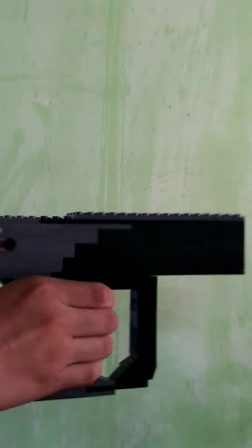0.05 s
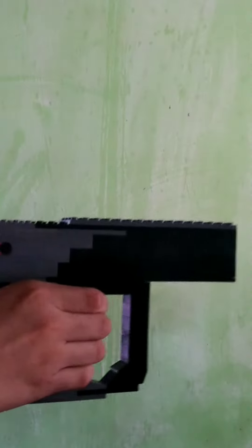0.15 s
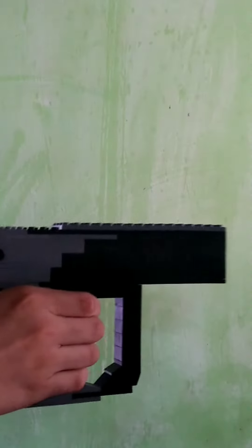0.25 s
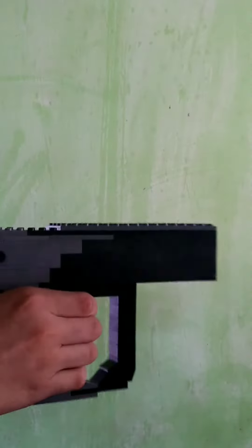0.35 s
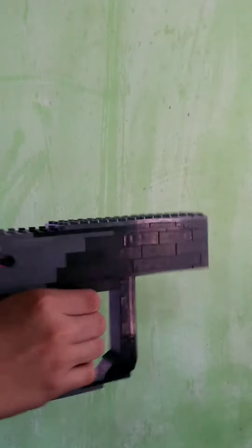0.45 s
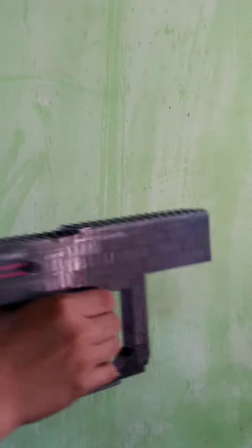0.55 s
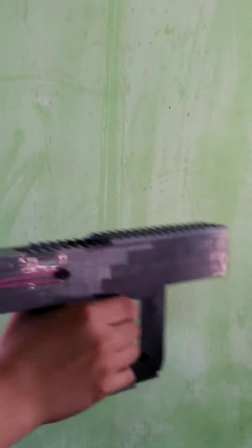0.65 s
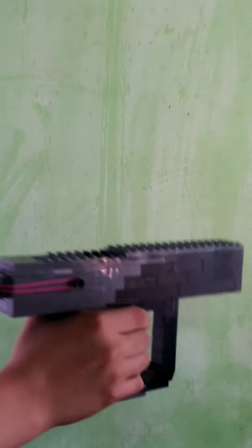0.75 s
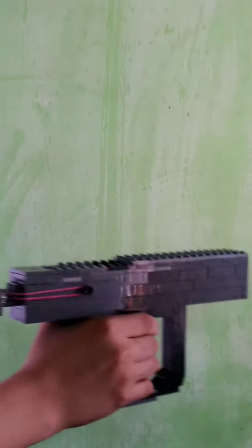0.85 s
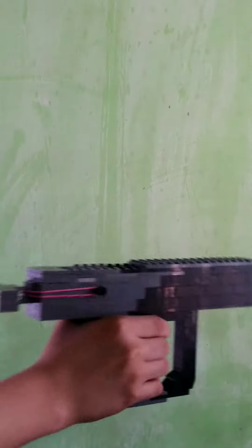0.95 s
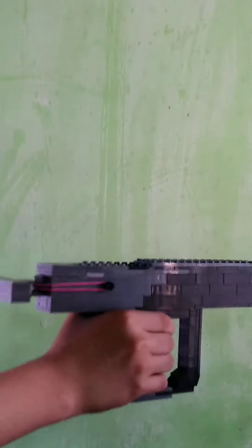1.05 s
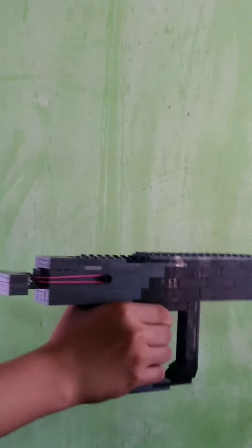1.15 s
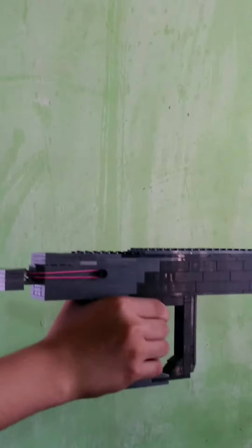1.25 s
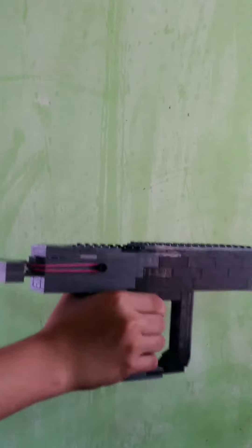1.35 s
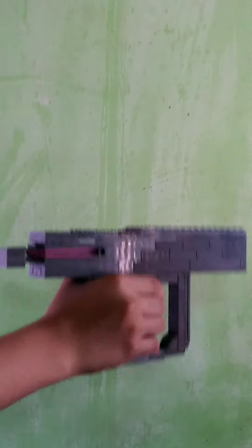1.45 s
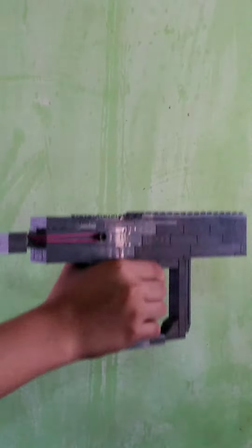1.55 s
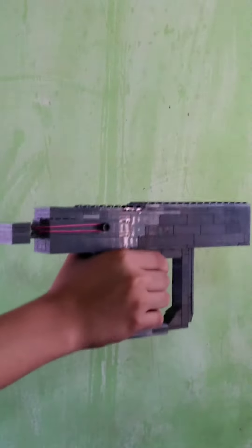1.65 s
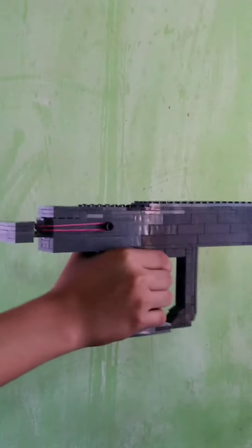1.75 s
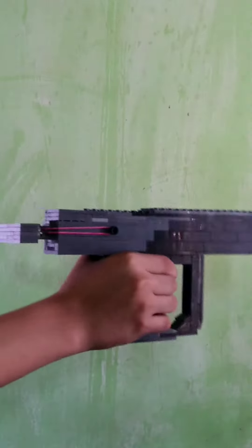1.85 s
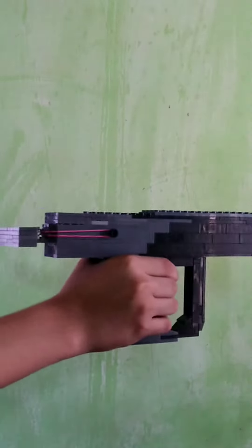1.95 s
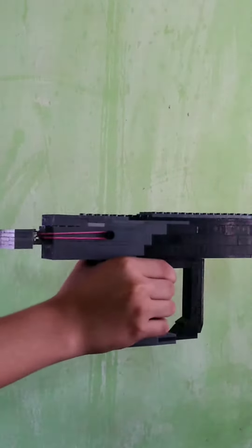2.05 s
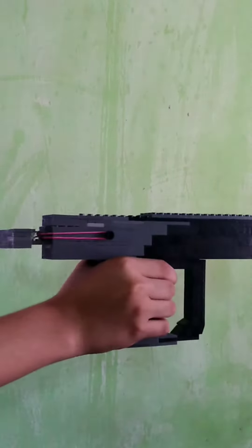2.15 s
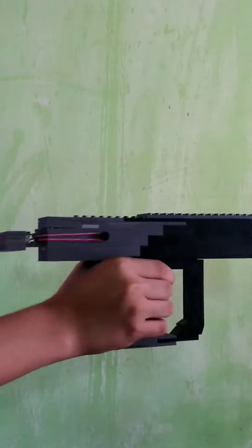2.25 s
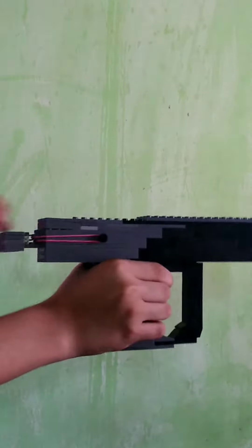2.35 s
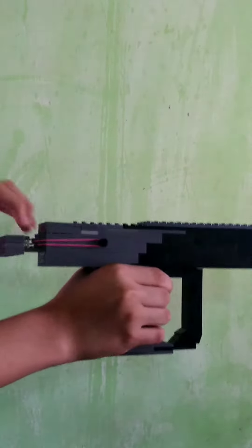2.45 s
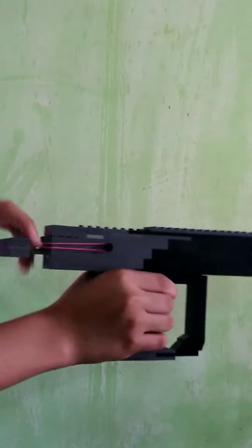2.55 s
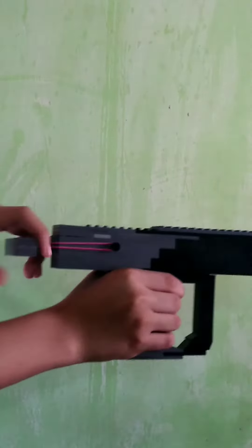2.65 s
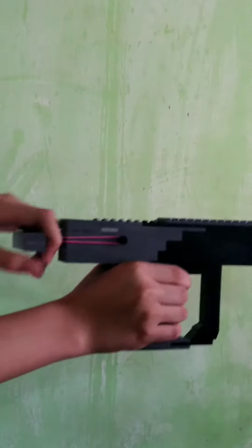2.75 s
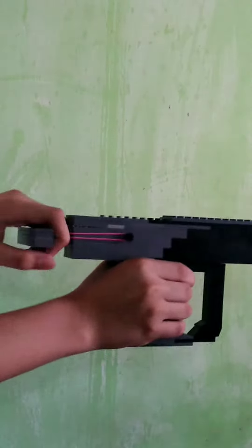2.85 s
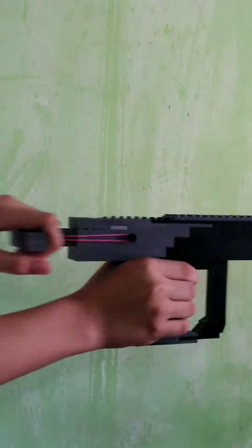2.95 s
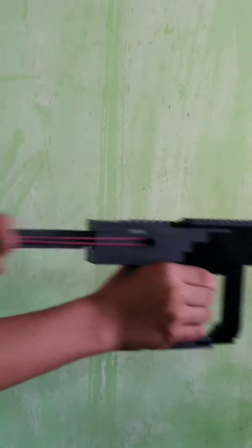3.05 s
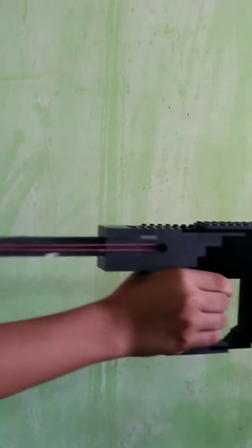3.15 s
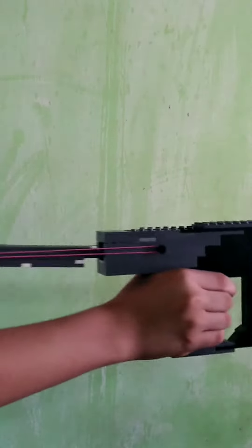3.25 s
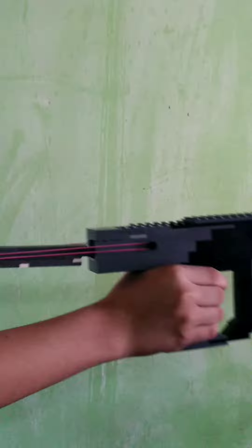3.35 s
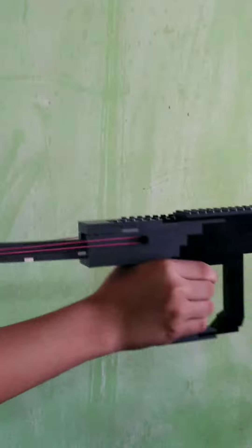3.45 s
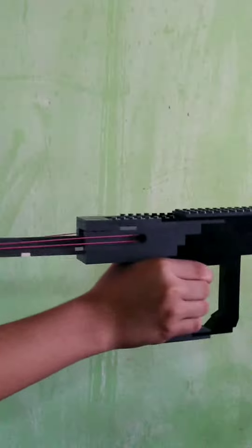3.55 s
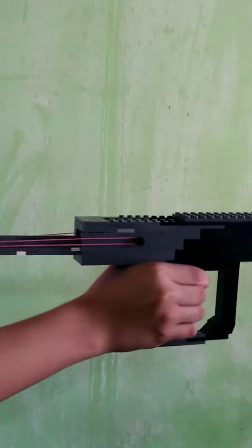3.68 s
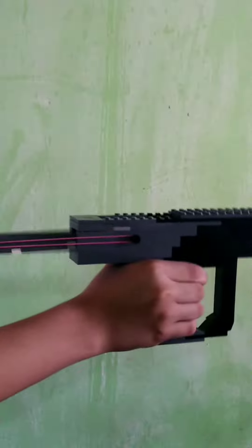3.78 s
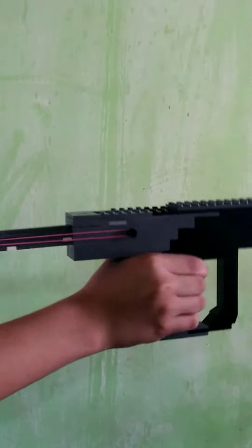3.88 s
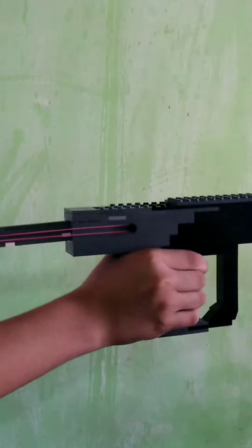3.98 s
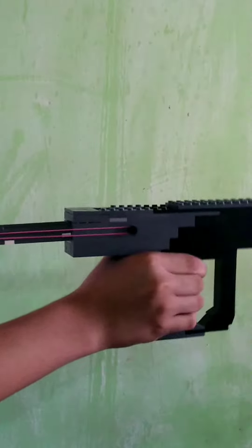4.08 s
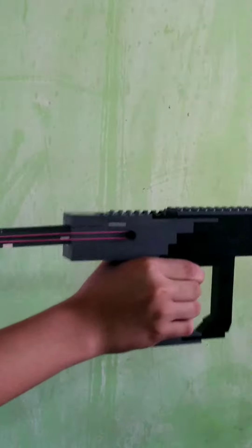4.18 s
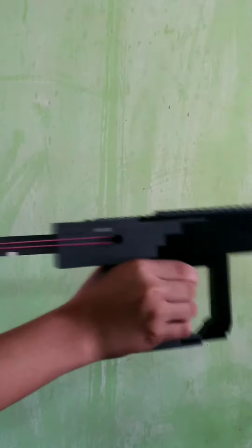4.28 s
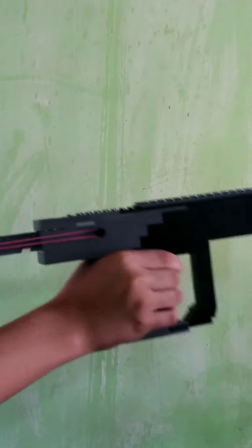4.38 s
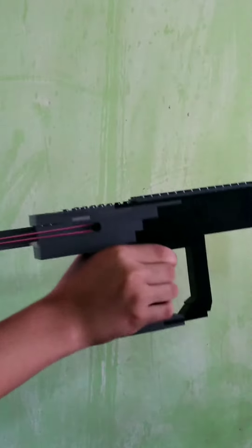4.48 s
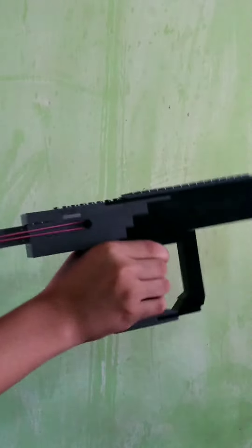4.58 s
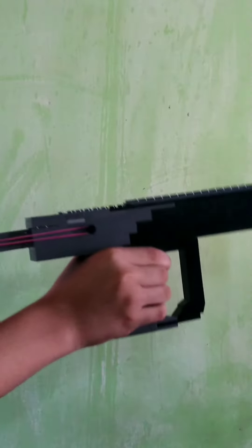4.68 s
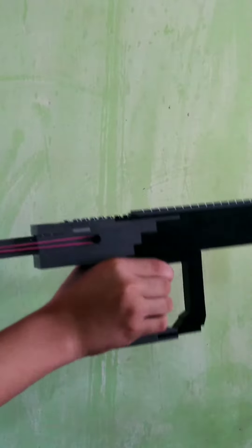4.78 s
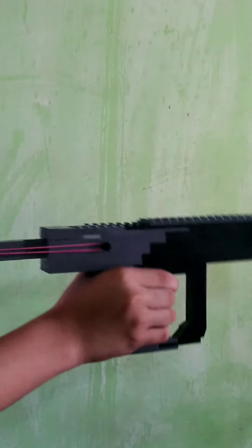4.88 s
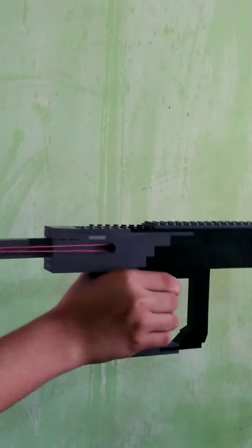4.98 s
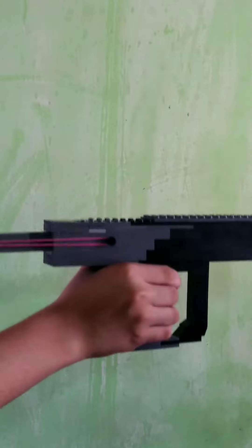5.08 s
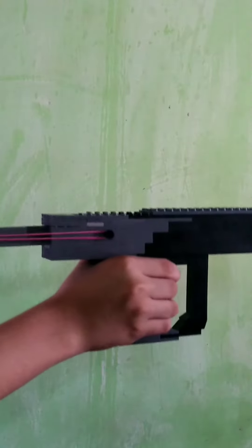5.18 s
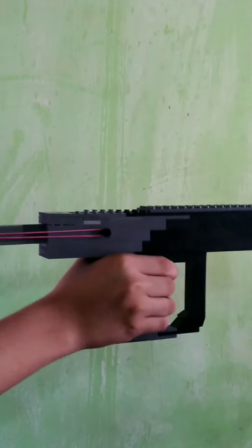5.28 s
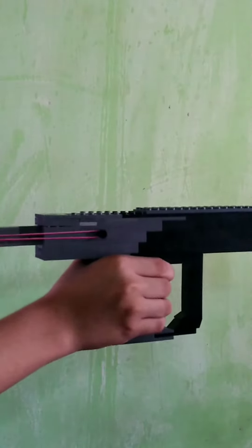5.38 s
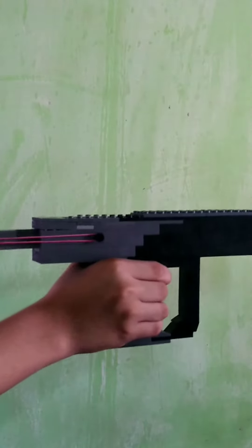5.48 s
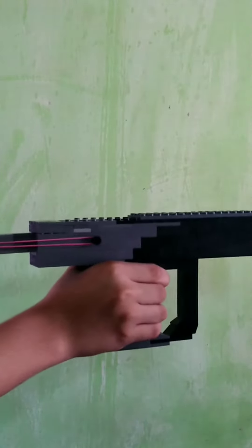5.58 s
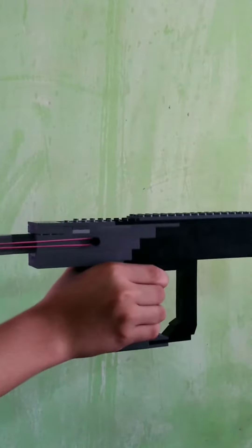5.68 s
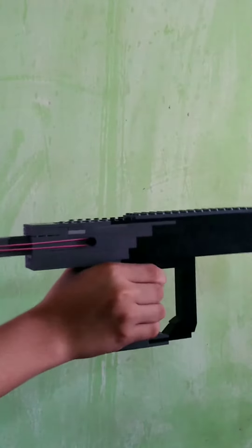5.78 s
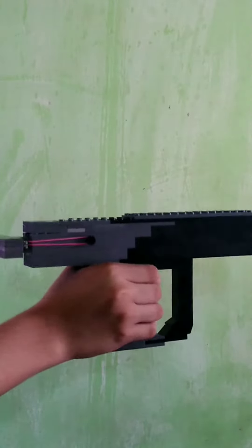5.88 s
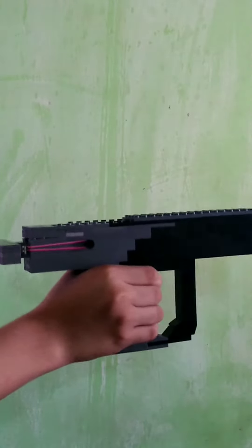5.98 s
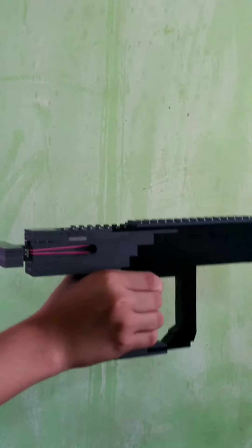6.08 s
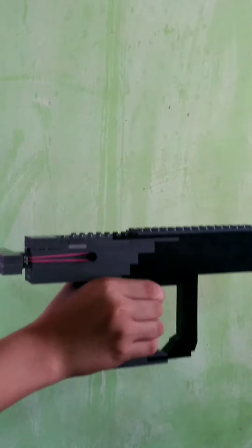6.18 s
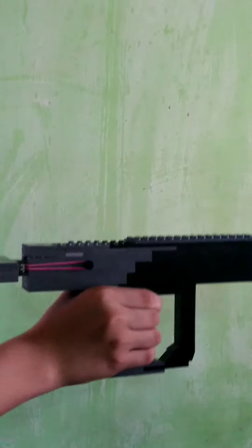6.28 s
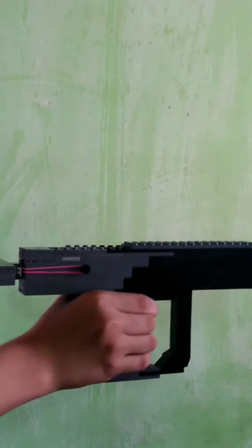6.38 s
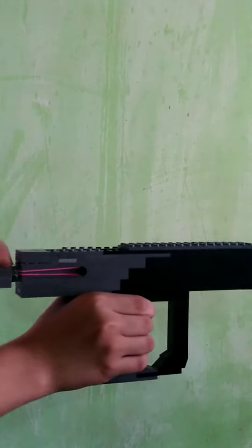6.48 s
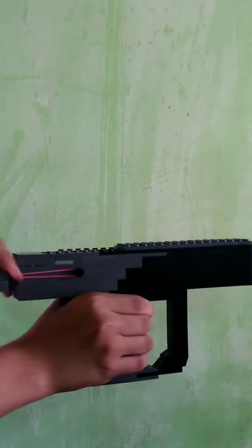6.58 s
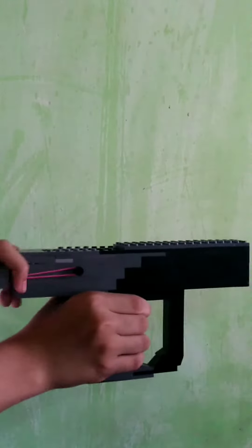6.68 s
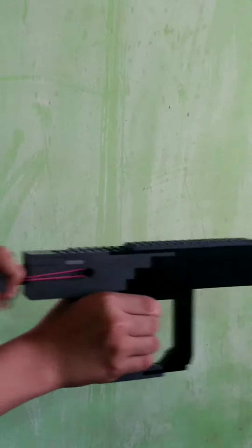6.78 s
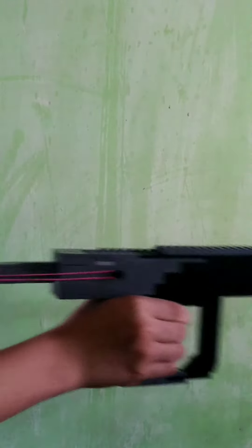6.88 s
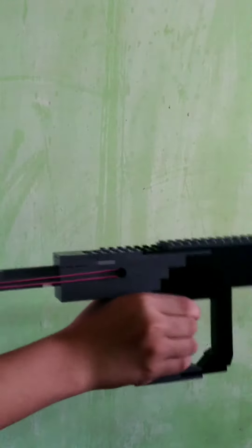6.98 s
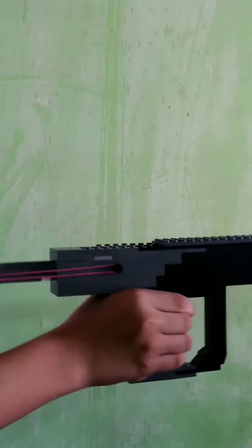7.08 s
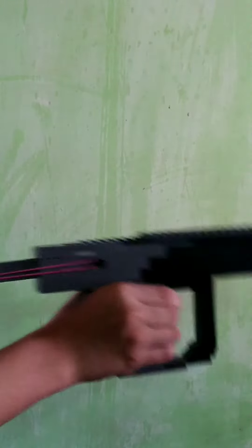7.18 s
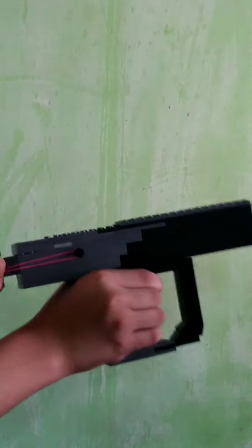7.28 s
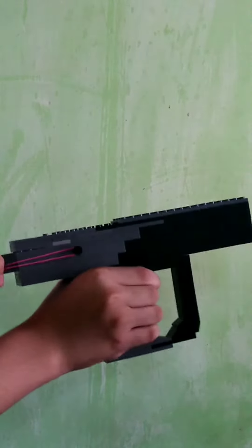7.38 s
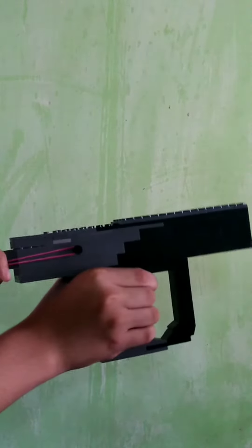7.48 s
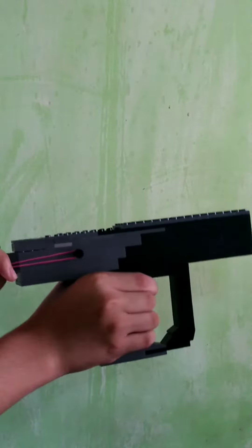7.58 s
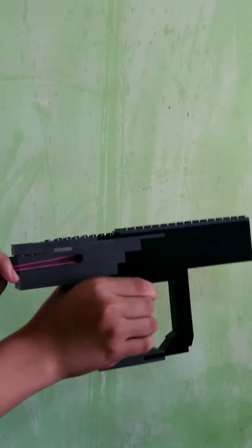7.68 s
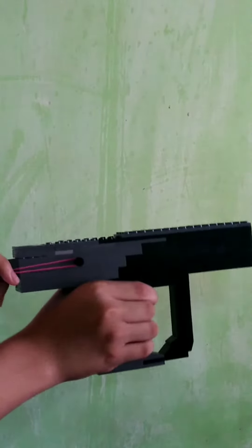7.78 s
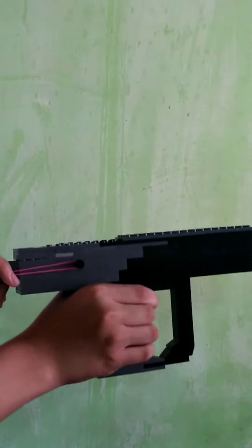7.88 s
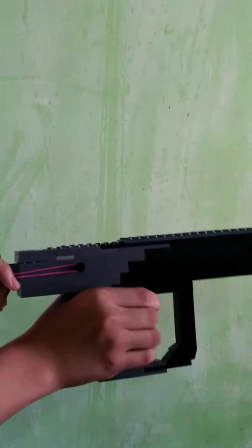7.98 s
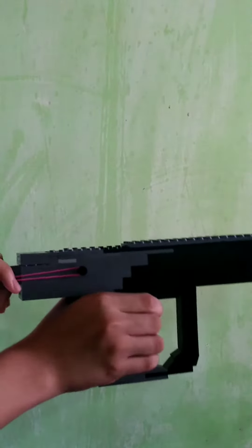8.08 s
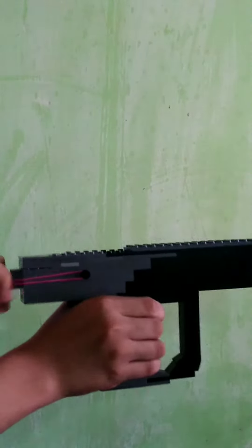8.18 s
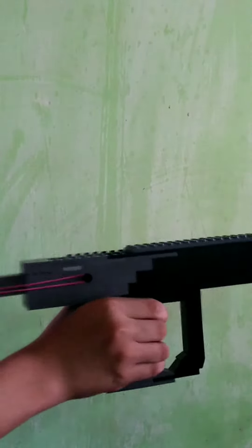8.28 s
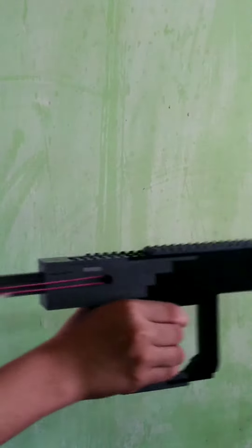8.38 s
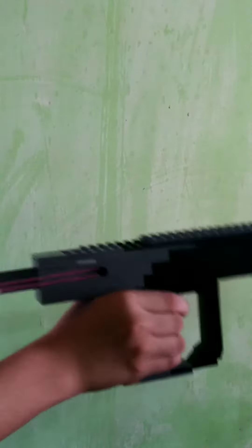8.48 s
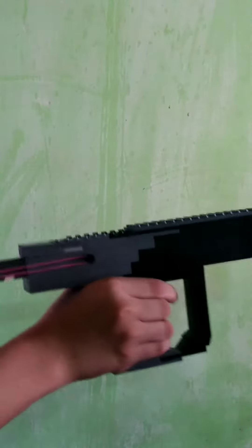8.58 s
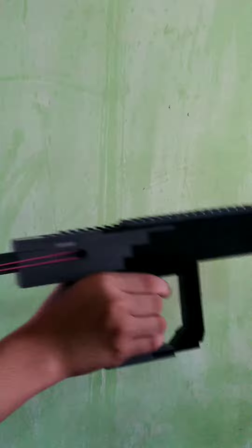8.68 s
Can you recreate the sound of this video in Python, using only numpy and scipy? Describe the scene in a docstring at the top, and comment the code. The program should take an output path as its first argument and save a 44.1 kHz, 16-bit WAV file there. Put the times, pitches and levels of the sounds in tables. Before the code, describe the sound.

A plastic brick toy gun is handled, cocked and fired in a small hard room, with sharp clacks, scrapes and low handling rumble.

```python
"""A toy gun of plastic bricks is cocked and fired in a small, hard-walled room: its slide catches, snaps and chatters.
Each contact is a noise burst with a rebound, coloured by the modes of the hollow shell and answered by the walls.
Small parts tick with modes of their own, the slide scrapes in grains, and tight bricks squeak as thin wavering tones.
Before the action, shaped noise rubs softly to one side and a padded bump is heard.
Under it all lie a dull room rumble and low handling noise, which buffets mostly the left port of the microphone."""
import sys
import numpy as np
from scipy import signal
from scipy.fft import rfft, irfft, next_fast_len
from scipy.io import wavfile
from scipy.ndimage import uniform_filter1d, map_coordinates

SR = 44100
rng = np.random.default_rng(int(sys.argv[2]) if len(sys.argv) > 2 else 0)


def transcribe(u):
    """Save the signal u as a 16-bit wav file named by the first command-line argument.

    u: samples, shape (n,) or (channels, n), limited to [-1, 1]; the rate is SR.
    q: integer samples, one column per channel.
    """
    v = np.clip(np.atleast_2d(u).T, -1, 1)
    q = np.round(v * 32767).astype(np.int16)
    wavfile.write(sys.argv[1], SR, q)


N = 385434  # length in samples

# All levels are relative: each layer sets its own gain on top.
# room rumble colour: f/Hz, density level/dB
AIR_COLOUR = [(15, -76.5), (25, -40.5), (50, -14), (122, 0), (208, -5.5), (278, -3.5), (309, -10),
              (392, -6.5), (554, -13), (599, -12), (761, -11.5), (916, -11.5), (1600, -31), (1950, -43),
              (2600, -44.5), (14000, -56.5)]
# left-right likeness of diffuse noise: f/Hz, correlation
PORT_LIKENESS = [(50, 1), (130, 0.82), (280, 0.93), (550, 0.67), (1000, 0), (3000, 0.16)]
# decay of the walls' answer: f/Hz, t60/s
ROOM_DECAY = [(300, 0.17), (1500, 0.3), (5000, 0.28), (9000, 0.27), (14000, 0.25)]
# handling noise colour: f/Hz, density level/dB
BUFFET_COLOUR = [(20, -47), (36, -26), (50, -14), (70, 0.5), (110, -4.5), (160, -10), (250, -21.5),
                 (500, -44.5), (1200, -80.5)]
# handling jolts at the left port: t/s, level/dB
JOLTS = [(5.445, -43), (5.52, -39.5), (6.26, -40.5), (6.38, -40.5), (6.435, -41), (7.878, -37.5),
         (8.056, -33.5), (8.181, -26.5), (8.36, -27.5)]
# longer shifts of the grip: start t/s, length/s, left level/dB, right level/dB
GRIP_SHIFTS = [(6.09, 0.41, -51.5, -69.5), (8.001, .22, -35.5, -58.5), (8.232, 0.24, -33, -49),
               (8.478, .1, -39.5, -42), (8.595, 0.134, -42, -49)]
# padded bump colour: f/Hz, density level/dB
BUMP_COLOUR = [(30, -38), (60, -18), (95, 5), (150, -3), (280, -9.5), (400, -17), (800, -15), (1200, -39),
               (2200, -42.5), (3000, -65)]
# faint squeaks of tight bricks: start t/s, length/s, mean pitch f/Hz, level/dB
SQUEAKS = [(2.585, 0.019, 6300, -69), (2.62, 0.076, 6400, -83), (7.97, 0.16, 6490, -80)]
# soft rubbing strokes: start t/s, length/s, level/dB, low rasp level/dB
RUB_STROKES = [(.185, .045, -77, -2), (.61, .03, -76, -4), (0.824, 0.036, -70, -2), (.918, .1, -60, 7.5),
               (1.039, .23, -62, -4.5), (1.268, 0.046, -54.5, -4), (1.506, 0.049, -53.5, -2),
               (1.598, 0.035, -64, -8), (2.021, 0.052, -59, 12.5)]
# rubbing colour: f/Hz, density level/dB
RUB_COLOUR = [(1000, -4.5), (1900, -8), (2600, -10), (3400, -12.5), (4400, -1.5), (6000, 7.5), (8000, -1),
              (11000, -9), (14000, -27)]
# rubbing balance: f/Hz, left over right level/dB
RUB_PAN = [(1200, -10), (2300, -7), (4300, -9.5), (7800, 7.5), (14000, 17)]
# the slide dragging over brick seams: start t/s, length/s, level/dB
DRAGS = [(3.08, .09, -41.5), (3.2, 0.12, -51.5), (4.308, .11, -55), (7.201, 0.1, -48.5),
         (8.305, 0.15, -42.5)]
# modes of four small parts: f/Hz, width/Hz, level/dB
GRIP = [(1600, 85, 5), (1860, 89, 0), (2070, 77, 3), (3000, 150, -20)]
LATCH = [(2900, 150, 6), (3430, 150, -10), (3830, 150, 3), (4900, 220, 1.5), (6140, 300, -10),
         (9550, 200, -8), (10480, 250, -12), (11130, 200, -11), (12630, 200, -10)]
SLIDE_STOP = [(1570, 130, 5), (2950, 130, 3.5), (3270, 140, -11), (4270, 170, -4.5), (4670, 150, -4),
              (5480, 290, -7), (6000, 250, -2.5), (8440, 280, -9.5), (9300, 200, -24), (10500, 300, -13),
              (11100, 200, -20)]
TRIGGER = [(272, 22, 22), (900, 67, 8), (1320, 46, 5), (1680, 150, -1.5), (3050, 100, -3.5),
           (3800, 160, -13), (4830, 180, -7), (5480, 140, -2.5), (6900, 130, 0), (7450, 180, -4.5),
           (8700, 120, -14), (12950, 200, -24)]
# light ticks of single parts: t/s, level/dB, left over right level/dB, room level/dB, modes of the part
TICKS = [(1.964, -34.5, -2.5, 2, GRIP), (2.43, -39, -5.5, -7.5, LATCH),
         (3.513, -30.5, -3.5, 0.5, SLIDE_STOP), (5.296, -27, -2, 2.5, TRIGGER)]
# brick contacts: t/s, level/dB, then hollow knock, mid clack and bright edge level/dB
CONTACTS = [(3.0617, -29, 3, -0.5, -19), (3.111, -28.5, -9, -11, -25), (3.1853, -29.5, -7.5, -12, -12),
            (3.2882, -25, -18, -22, -13.5), (3.8649, -24.5, -4.5, -12, -24), (4.3189, -48, 16, 4, -33.5),
            (4.3386, -33, -6, -10, -27), (4.4155, -32, -5, -10, -28), (4.6046, -15.5, -14.5, -17, -18.5),
            (5.8478, -11.5, -11, -14, -18), (5.8627, -12.5, -17, -11, -15), (5.8691, -10.5, -16, -5.5, -16),
            (5.8843, -19.5, -16.5, -14, -16), (5.8958, -17.5, -14.5, -16, -17),
            (6.8599, -27, -3.5, -10, -20), (6.8918, -13.5, -13.5, -11.5, -21),
            (6.9177, -14, -18.5, -15.5, -16), (7.216, -28, -5, -8.5, -28), (7.276, -17.5, -11, -7, -21),
            (7.3145, -25, -23, -16, -25.5), (8.3175, -23, -2, -9.5, -23.5), (8.3553, -29, 0.5, -17, -11.5),
            (8.4264, -35, 3, -3, -28), (8.4434, -32.5, 1, -8, -29), (8.5446, -41.5, 8, -5, -45),
            (8.5731, -36.5, -3, -6, -52), (8.6016, -33.5, -8, 4.5, -59)]
# modes of the hollow brick body: f/Hz, width/Hz, level/dB
BODY_MODES = [(809.6, 43, -0.5), (1080, 18, -4), (1301, 26, 6), (1538, 20, 0), (1950, 110, -15.5),
              (2670, 90, -3), (2900, 94, 2), (3100, 25, -1), (3380, 63, 0.5), (3896, 41, -1.5),
              (4240, 17, -3.5), (4310, 30, -4), (4700, 70, -4.5), (5140, 33, -6.5), (5225, 45, -6.5),
              (5580, 76, -2), (5970, 310, -3.5), (6900, 120, -9.5)]
# broad colour of a plastic contact: f/Hz, level/dB
PLASTIC_COLOUR = [(150, -41.5), (500, -9), (800, -1.5), (1300, 0.5), (2000, 5), (3000, 1.5), (5000, 1),
                  (6500, -3), (8000, -8.5), (11000, -12.5), (14000, -22.5)]
# balance of the contacts: f/Hz, left over right level/dB
CONTACT_PAN = [(700, 0.5), (1300, -1.5), (2500, -1.5), (5000, -4.5), (7000, -1.5), (9000, 5.5), (13000, -1)]

BAND_LIMIT_HZ = 14300
JOLT_SIGMA_S = 0.013  # standard deviation of the bell-shaped jolt
SHIFT_ATTACK_S, SHIFT_RELEASE_S = 0.046, 0.036
BUMP_AT_S, BUMP_LENGTH_S, BUMP_DB = 0.249, 0.064, -42
BUMP_ATTACK_S, BUMP_RELEASE_S = 0.023, 0.095
RUB_ATTACK_S, RUB_RELEASE_S = 0.035, 0.012
DRAG_ATTACK_S, DRAG_RELEASE_S = 0.018, 0.012
DRAG_FADE_DB_PER_S = -32  # the scrape weakens as the slide slows
REBOUND_S, REBOUND_DB = 0.005, -4.5  # delay and level against the first contact
CHATTER_DB = -9.5  # loose bricks tapping after a contact
TOP_GROWS = 1.4  # the top of the treble follows the edge more strongly


def amp(db):
    """Decibels to gain."""
    return 10 ** (np.asarray(db) / 20)


def left_right(balance_db):
    """Split a left-over-right balance in dB evenly between the two ports."""
    return balance_db * np.array([[0.5], [-0.5]])


def unit(x):
    """Scale to rms 1."""
    return x / np.sqrt(np.mean(x ** 2) + 1e-20)


def along(points, hz):
    """Join (f/Hz, value) points on a log frequency axis."""
    f, v = np.transpose(points)
    return np.interp(np.log(hz + 1), np.log(f + 1), v)


def wobble(rate):
    """A smooth random curve with rate knots a second."""
    knots = rng.standard_normal(int(N * rate / SR) + 4)
    return map_coordinates(knots, [np.arange(N) * rate / SR])


def stroke(start, length, attack_s, release_s):
    """Gain of one movement: a smooth rise, a hold to its length, then an exponential fade."""
    t = np.arange(N) / SR - start
    rise = np.sin(np.pi / 2 * np.clip(t / attack_s, 0, 1)) ** 2
    return rise * np.exp(-np.maximum(t - length, 0) / release_s)


def add(track, s, x):
    """Mix x into the track from time s on."""
    start = max(round(s * SR), 0)
    part = track[:, start:start + x.shape[-1]]
    part += x[..., :part.shape[-1]]


def filtered(x, response):
    """Shape the spectrum of x by a response of frequency."""
    n = x.shape[-1]
    m = next_fast_len(n + 8192)
    return irfft(rfft(x, m) * response(np.fft.rfftfreq(m, 1 / SR)), m)[..., :n]


def causal(x, gain):
    """Colour x in minimum phase, so nothing sounds ahead of the attack."""
    def response(hz):
        cepstrum = irfft(np.log(np.maximum(gain(hz), 1e-6)))
        half = len(cepstrum) // 2
        folded = np.r_[cepstrum[0], 2 * cepstrum[1:half], np.zeros(half)]
        return np.exp(rfft(folded))
    return filtered(x, response)


def patchy(x, depth):
    """Let narrow bands of x swell and fade on their own, as deep as the (f/Hz, level/dB) points say."""
    hz, _, z = signal.stft(x, SR, nperseg=1024)
    field = rng.standard_normal(z.shape[-2:])
    field = uniform_filter1d(field, size=4, axis=0)  # across frequency
    field = uniform_filter1d(field, size=5, axis=1)  # across time
    swell = amp(along(depth, hz)[:, None] * unit(field))
    return signal.istft(z * swell, SR, nperseg=1024)[1][..., :N]


def diffuse(colour):
    """Stereo noise of rms 1, nearly the same at both ports in the bass."""
    def mid_side_gain(hz):
        turn = np.arccos(np.clip(along(PORT_LIKENESS, hz), -1, 1)) / 2
        return amp(along(colour, hz)) * np.array([np.cos(turn), np.sin(turn)])
    mid, side = filtered(rng.standard_normal((2, N)), mid_side_gain)
    return unit(np.array([mid + side, mid - side]))


def room_tail(build_s=0.0027):
    """A stereo wall answer of energy 1 a side: noise that builds up fast, each band dying at its own rate."""
    n = SR // 2
    hz, t, z = signal.stft(rng.standard_normal((2, n)), SR, nperseg=256)
    decay = amp(-60 * t / along(ROOM_DECAY, hz)[:, None])
    tail = signal.istft(z * decay, SR, nperseg=256)[1][:, :n]
    tail = tail * (1 - np.exp(-np.arange(n) / SR / build_s))
    return tail / np.linalg.norm(tail, axis=1, keepdims=True)


def in_room(x, wet_db):
    """A sustained sound plus the walls' answer."""
    return x + amp(wet_db) * signal.fftconvolve(x, room_tail(), axes=1)[:, :N]


def echoed(burst, wet_db):
    """A short burst with the walls' full answer to it."""
    answer = amp(wet_db) * signal.fftconvolve(burst, room_tail(), axes=1)
    add(answer, 0, burst)
    return answer


def resonances(modes, hz, plain_db):
    """Gain of a plastic piece: narrow modes over a bed of dense ones."""
    peaks = sum(amp(db) ** 2 / (1 + ((hz - centre) / (width / 2)) ** 2) for centre, width, db in modes)
    return np.sqrt(amp(plain_db) ** 2 + peaks)


def body(hz):
    """Colour of the whole brick shell: its modes times the broad plastic colour."""
    return resonances(BODY_MODES, hz, plain_db=-5) * amp(along(PLASTIC_COLOUR, hz))


def contact(chatter_db, crack_t60=0.014, shell_t60=0.096, shell_db=-2, chatter_s=0.0073,
            shared_db=-3, rise_s=0.0005, strike_db=-10, count=6):
    """A hard strike and crack, the shell's short ring, then loose bricks tapping; energy 1 a side."""
    t = np.arange(SR // 8) / SR

    def power(u, t60):
        return (u >= 0) * amp(-120 * np.maximum(u, 0) / t60) / t60

    envelope = power(t, crack_t60) + amp(shell_db) ** 2 * power(t, shell_t60)
    for s in 0.0024 + rng.exponential(chatter_s, count):  # later taps are weaker
        envelope = envelope + amp(chatter_db) ** 2 * np.exp(-s / (2 * chatter_s)) * power(t - s, crack_t60)
    noise = rng.standard_normal((2, len(t)))
    noise = noise + amp(shared_db) * rng.standard_normal(len(t))  # part reaches both ports alike
    burst = np.sqrt(envelope) * (1 - np.exp(-t / rise_s)) * noise
    strike = amp(strike_db) * np.linalg.norm(burst, axis=1, keepdims=True)  # a single-sample impulse
    add(burst, rise_s, strike)
    return burst / np.linalg.norm(burst, axis=1, keepdims=True)


def room_air(level_db=-50.5, pan_db=-1.4, lead_s=0.0002):
    """Dull rumble with random patchy swelling, most between 0.9 and 2 kHz; the left port hears it a little earlier."""
    rumble = patchy(diffuse(AIR_COLOUR),
                    [(300, 1), (900, 2.2), (1250, 5.1), (1700, 6.1), (2300, 1.5), (12000, 2)])
    rumble = filtered(rumble, lambda hz: np.exp(1j * np.pi * hz * lead_s * np.array([[1], [-1]])))
    return rumble * amp(level_db + left_right(pan_db))


def handling(steadiness=0.51):
    """Low buffeting, unrelated from port to port: slow shifts of the grip and short jolts on the left."""
    t = np.arange(N) / SR
    rumble = filtered(rng.standard_normal((2, N)), lambda hz: amp(along(BUFFET_COLOUR, hz)))
    swell = np.abs(uniform_filter1d(rumble ** 2, size=2000)) + 1e-12
    steadied = unit(rumble / swell ** (steadiness / 2))  # partly evens out the swells
    shifts = sum(amp([[left_db], [right_db]]) * stroke(s, length, SHIFT_ATTACK_S, SHIFT_RELEASE_S)
                 for s, length, left_db, right_db in GRIP_SHIFTS)
    jolts = sum(amp(db) * np.exp(-0.5 * ((t - s) / JOLT_SIGMA_S) ** 2) for s, db in JOLTS)
    return np.array([np.hypot(shifts[0], jolts), shifts[1]]) * steadied


def bump():
    """A dull, padded thud of diffuse noise as the grip shifts."""
    force = stroke(BUMP_AT_S, BUMP_LENGTH_S, BUMP_ATTACK_S, BUMP_RELEASE_S)
    return amp(BUMP_DB) * force * diffuse(BUMP_COLOUR)


def squeaks(waver=0.0054, octave_db=-18):
    """Stick-slip of tight plastic: a thin wavering tone and its octave."""
    track = np.zeros((2, N))
    for s, length, hz, db in SQUEAKS:
        n = int(length * SR)
        pitch = hz * (1 + waver * wobble(270)[:n])
        phase = 2 * np.pi * np.cumsum(pitch) / SR
        tone = np.sin(phase) + amp(octave_db) * np.sin(2 * phase)
        add(track, s, amp(db) * signal.windows.tukey(n) * tone)
    return in_room(track, wet_db=1)


def rubbing(level_db=-1, grain_db=2, catch_db=1.7, lead_s=0.000395):
    """Fine-grained friction off to the left, so it reaches the left port first."""
    grains = rng.standard_normal(N) * amp(grain_db * wobble(500))
    grains = patchy(grains, [(2000, 6.8), (6000, 3.5)])
    hiss = unit(filtered(grains, lambda hz: amp(along(RUB_COLOUR, hz))))
    rasp = filtered(hiss, lambda hz: 1 / (1 + (hz / 4000) ** 8))  # firmer pressure brings out the lower part
    sound = sum(amp(db) * stroke(s, length, RUB_ATTACK_S, RUB_RELEASE_S) * (hiss + (amp(rasp_db) - 1) * rasp)
                for s, length, db, rasp_db in RUB_STROKES)
    sound = sound * amp(level_db + catch_db * wobble(44.88))

    def ports(hz):
        half_pan = along(RUB_PAN, hz) / 2
        late = np.exp(-2j * np.pi * hz * lead_s)
        return np.array([amp(half_pan), amp(-half_pan) * late])

    return in_room(filtered(sound, ports), wet_db=-1.5)


def dragging(level_db=-3.5, grain_db=7, seam_db=2):
    """The slide sticks and slips in tiny grains, bunched at the brick seams, that sound through the body."""
    t = np.arange(N) / SR
    force = 0
    for s, length, db in DRAGS:
        fade_db = DRAG_FADE_DB_PER_S * np.clip(t - s, 0, length)
        force = force + amp(db + fade_db) * stroke(s, length, DRAG_ATTACK_S, DRAG_RELEASE_S)
    grains = rng.standard_normal((2, N)) * amp(grain_db * wobble(450) + seam_db * wobble(70))
    return in_room(amp(level_db) * force * unit(causal(grains, body)), wet_db=-2)


def ticks(level_db=20):
    """Single parts, struck lightly, ring with a few clear modes."""
    track = np.zeros((2, N))
    for s, db, pan_db, wet_db, modes in TICKS:
        blow = echoed(contact(chatter_db=-17), wet_db)
        ring = causal(blow, lambda hz: resonances(modes, hz, plain_db=-55.0))
        add(track, s, ring * amp(db + level_db + left_right(pan_db)))
    return track


def clicks(level_db=19, knock_ref_db=-10, clack_ref_db=-9, edge_ref_db=-20,
           colour_share=0.69, spot_db=2.5, spot_hz=200):
    """Each contact and its rebound excite the body with their own weight of knock, clack and edge."""
    track = np.zeros((2, N))
    grid = np.arange(256) * spot_hz
    for s, db, knock_db, clack_db, edge_db in CONTACTS:
        edge = edge_db - edge_ref_db
        tilt = [(1400, knock_db - knock_ref_db), (2800, clack_db - clack_ref_db),
                (4300, 0), (5800, 0), (9000, edge), (13000, TOP_GROWS * edge)]
        spot = spot_db * rng.standard_normal(len(grid))  # the spot that is struck favours some modes

        def colour(hz):
            return body(hz) * amp(colour_share * along(tilt, hz) + np.interp(hz, grid, spot))

        burst = contact(CHATTER_DB)
        add(burst, REBOUND_S, amp(REBOUND_DB) * contact(CHATTER_DB))
        add(track, s, amp(db + level_db) * causal(echoed(burst, wet_db=-2.5), colour))
    return filtered(track, lambda hz: amp(left_right(along(CONTACT_PAN, hz))))


def scene():
    """The room, the hands and the toy."""
    background = room_air() + handling() + bump()
    friction = squeaks() + rubbing() + dragging()
    return background + friction + ticks() + clicks()


def record(dry):
    """The microphone path rolls off steeply at its band limit."""
    return filtered(dry, lambda hz: 1 / np.sqrt(1 + (hz / BAND_LIMIT_HZ) ** 240))


dry = scene()
out = record(dry)
transcribe(out)
```